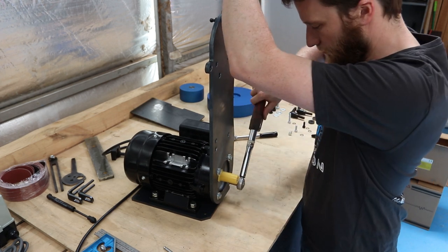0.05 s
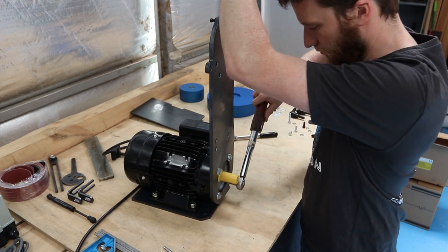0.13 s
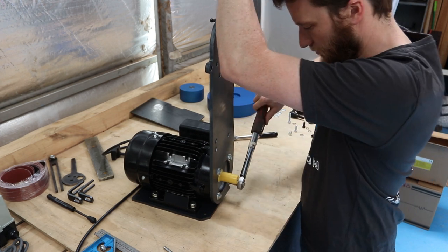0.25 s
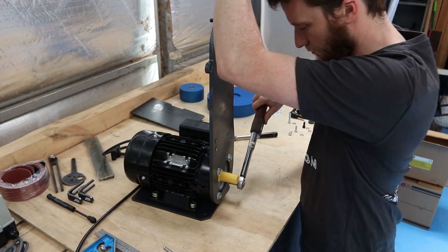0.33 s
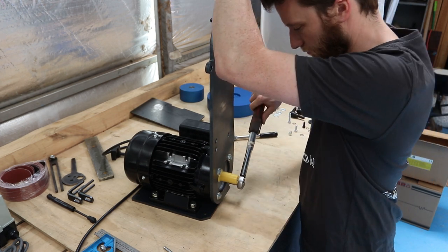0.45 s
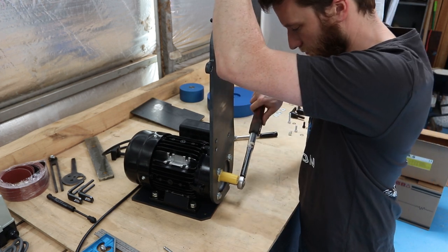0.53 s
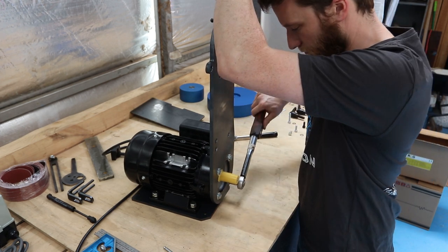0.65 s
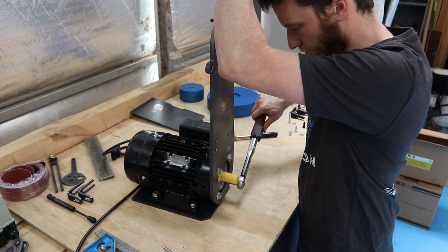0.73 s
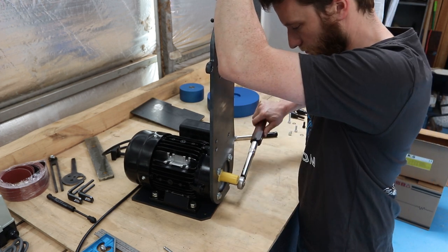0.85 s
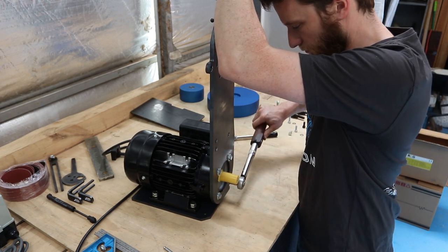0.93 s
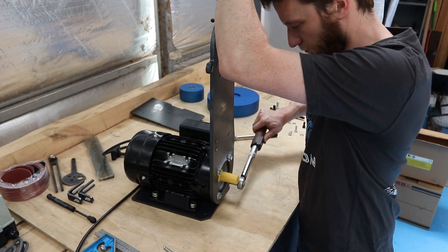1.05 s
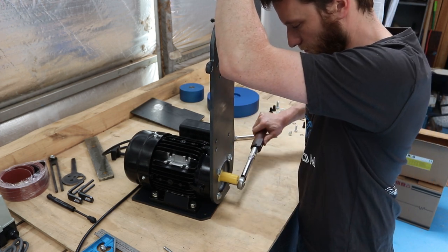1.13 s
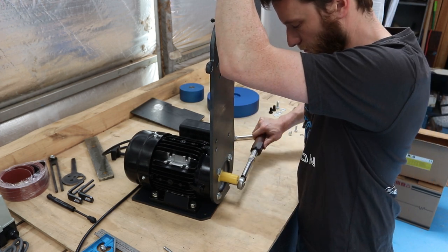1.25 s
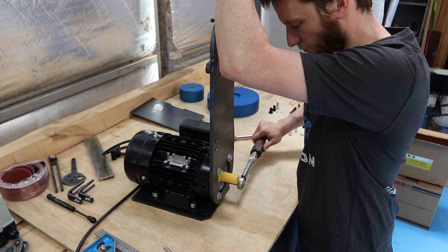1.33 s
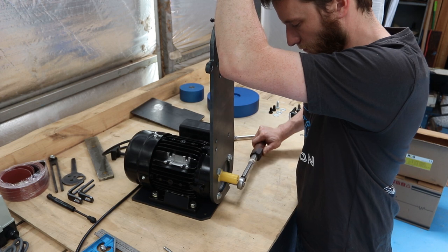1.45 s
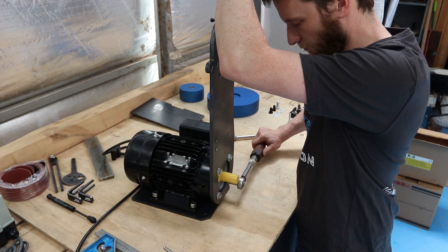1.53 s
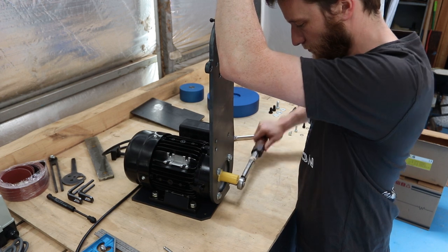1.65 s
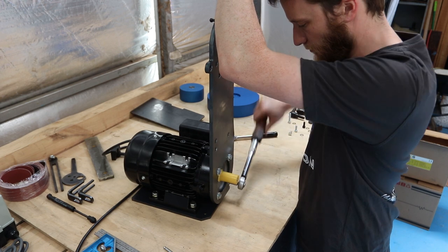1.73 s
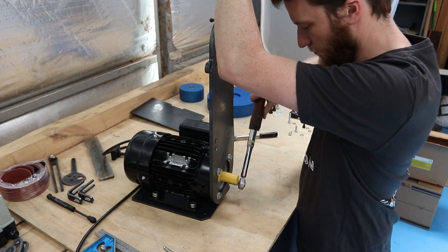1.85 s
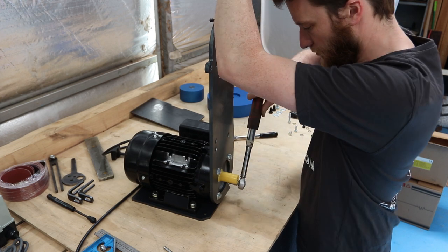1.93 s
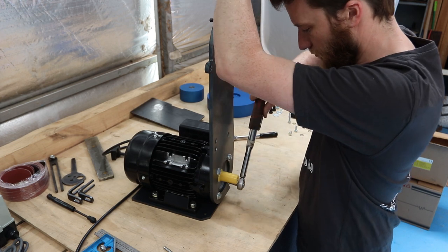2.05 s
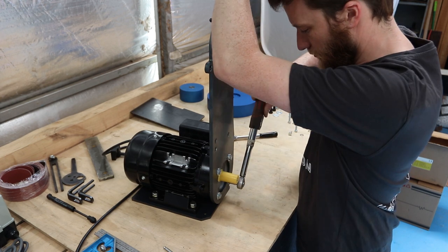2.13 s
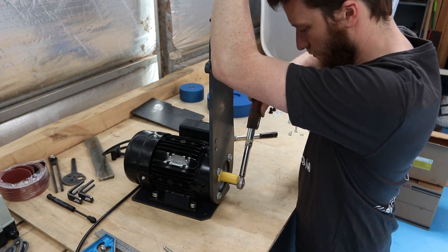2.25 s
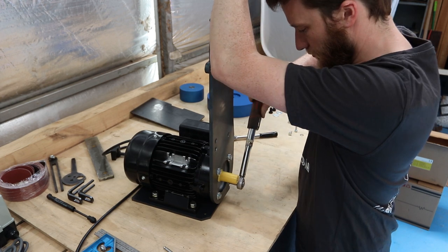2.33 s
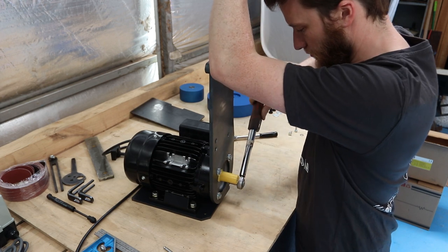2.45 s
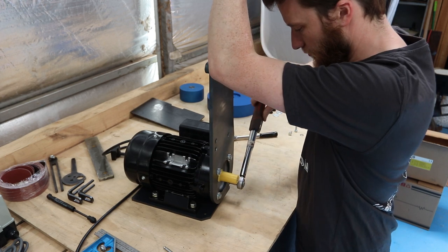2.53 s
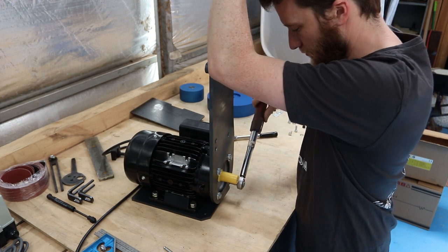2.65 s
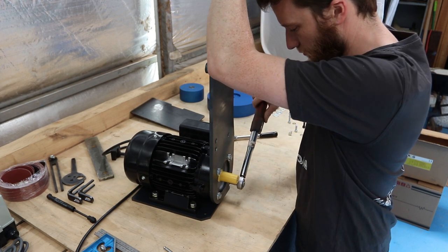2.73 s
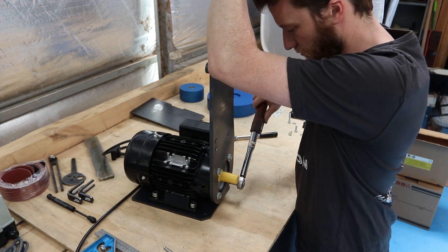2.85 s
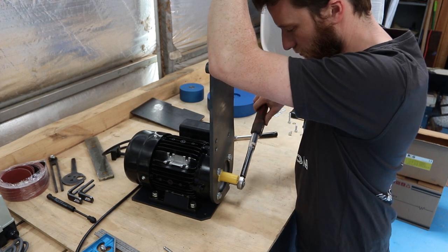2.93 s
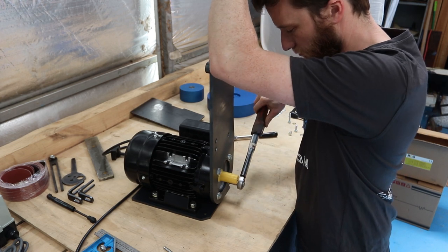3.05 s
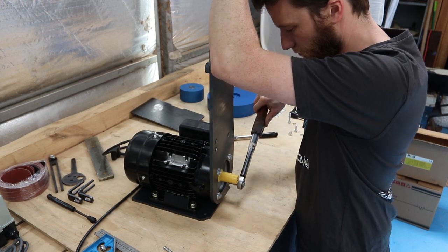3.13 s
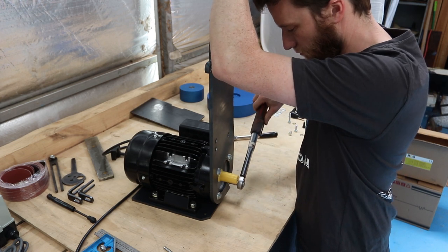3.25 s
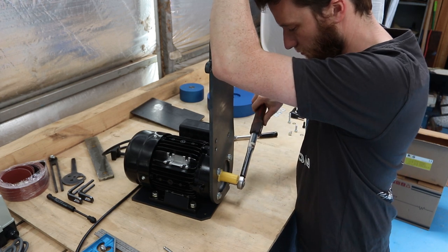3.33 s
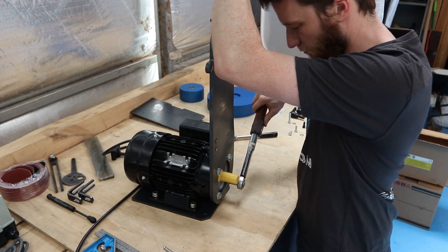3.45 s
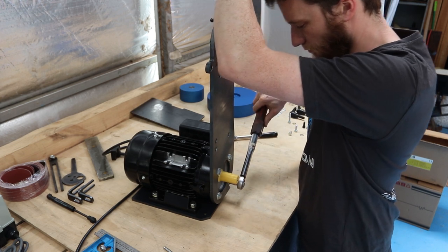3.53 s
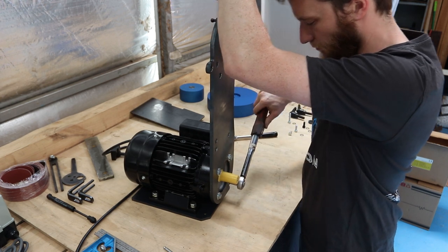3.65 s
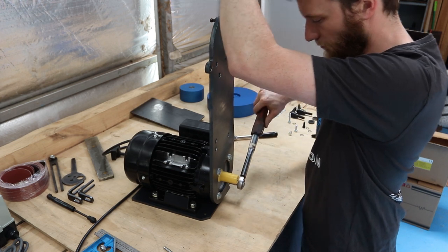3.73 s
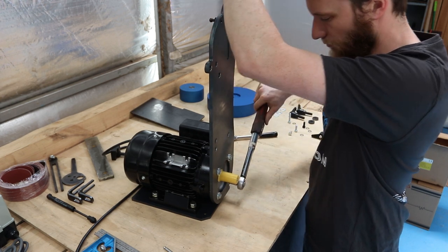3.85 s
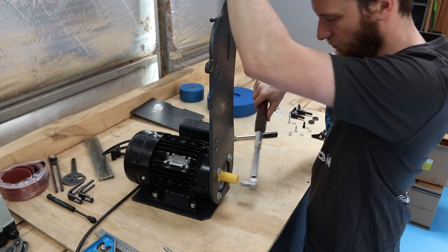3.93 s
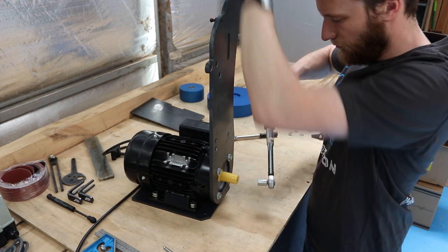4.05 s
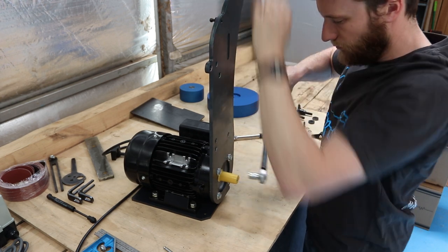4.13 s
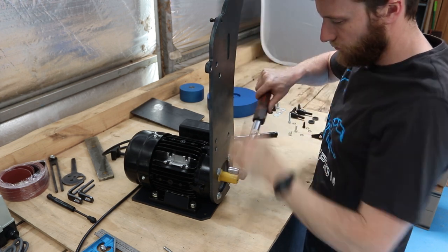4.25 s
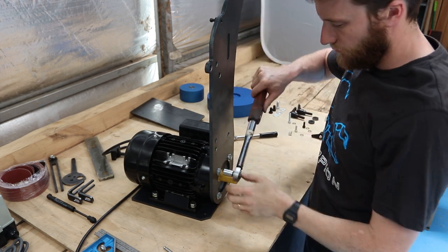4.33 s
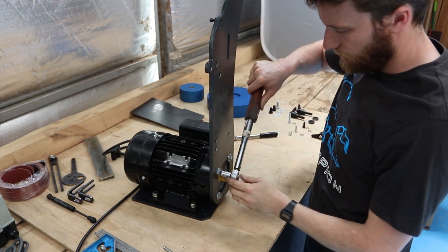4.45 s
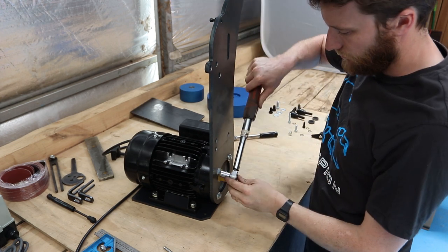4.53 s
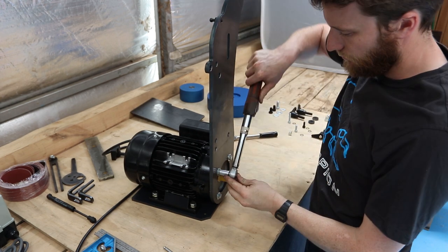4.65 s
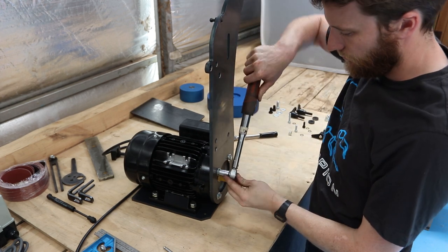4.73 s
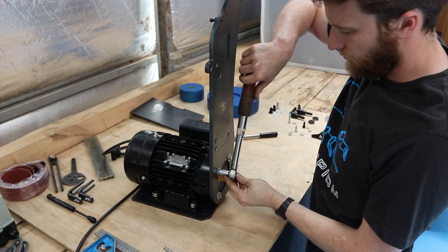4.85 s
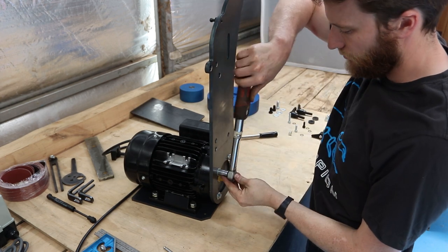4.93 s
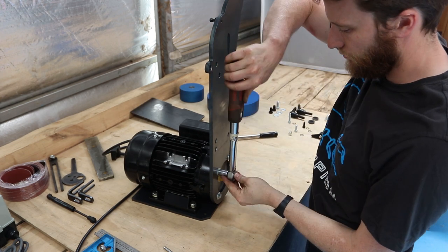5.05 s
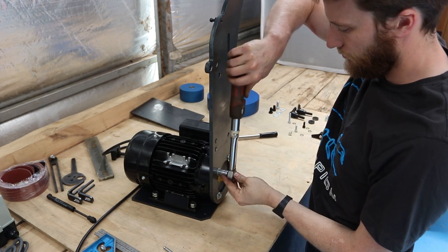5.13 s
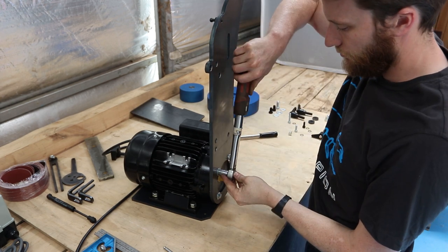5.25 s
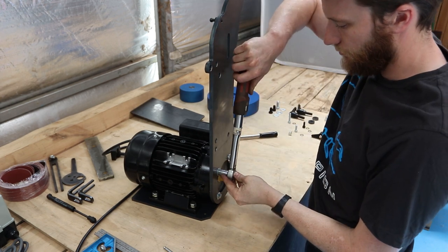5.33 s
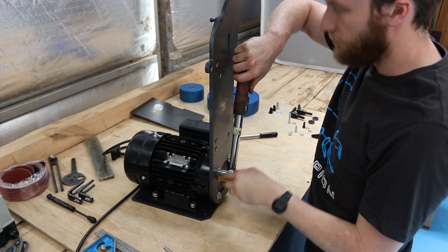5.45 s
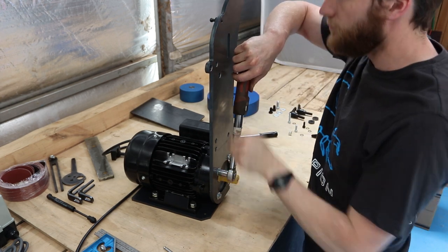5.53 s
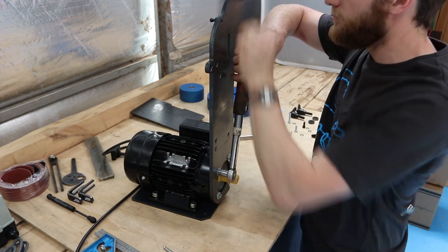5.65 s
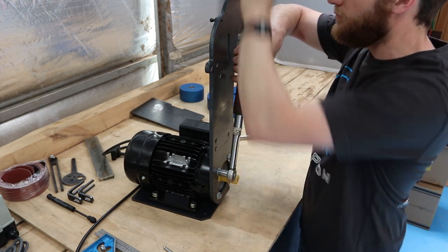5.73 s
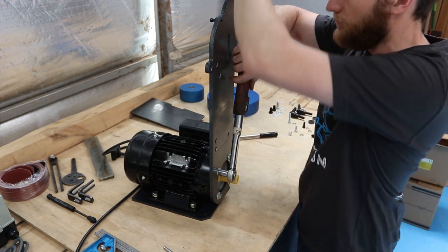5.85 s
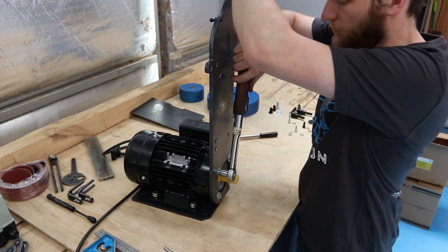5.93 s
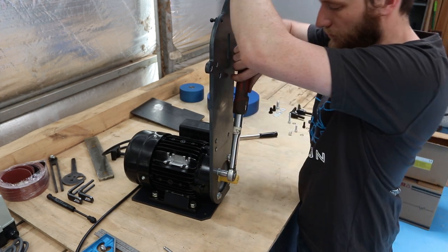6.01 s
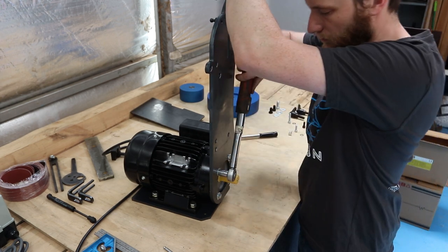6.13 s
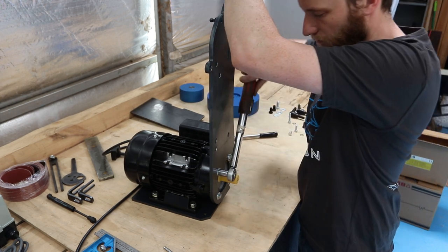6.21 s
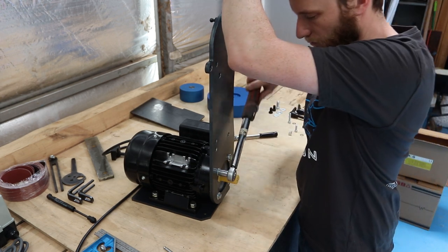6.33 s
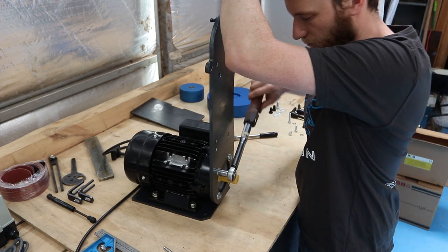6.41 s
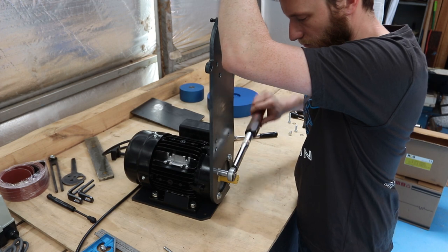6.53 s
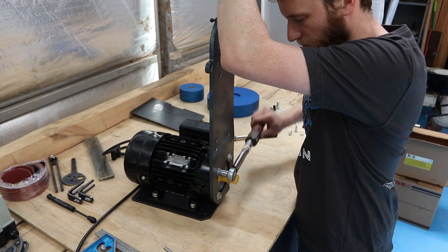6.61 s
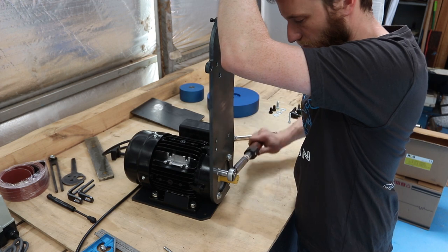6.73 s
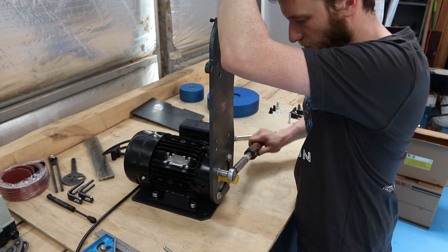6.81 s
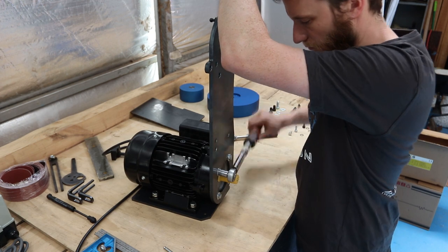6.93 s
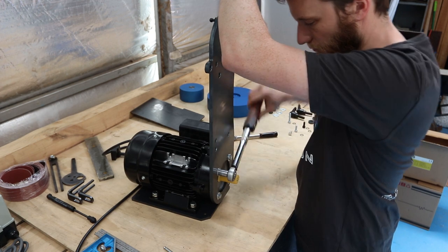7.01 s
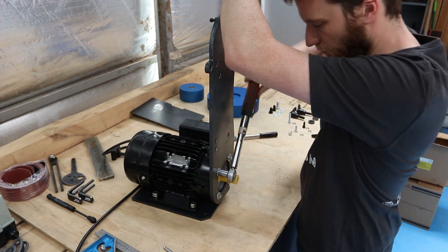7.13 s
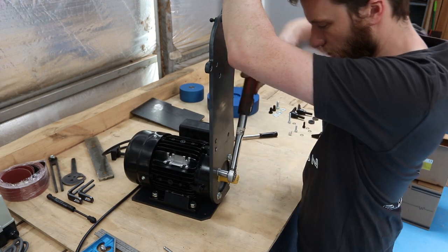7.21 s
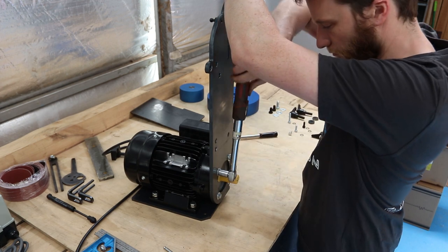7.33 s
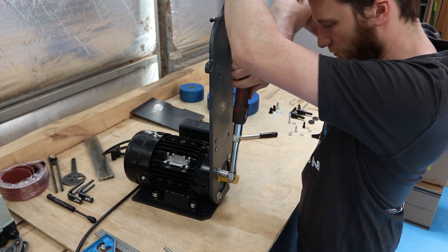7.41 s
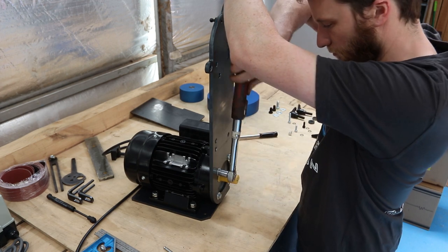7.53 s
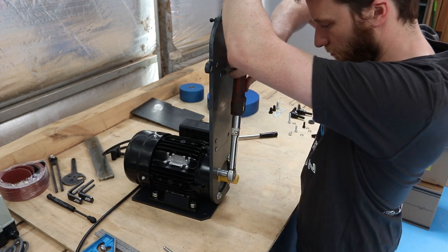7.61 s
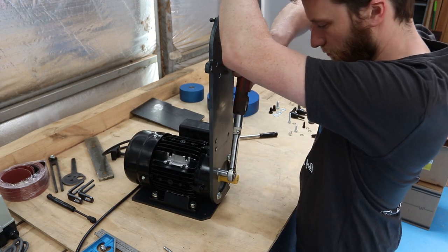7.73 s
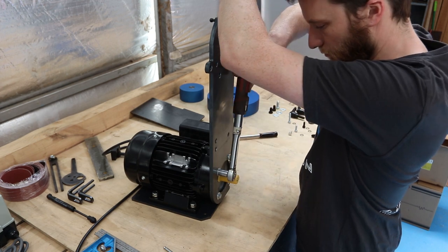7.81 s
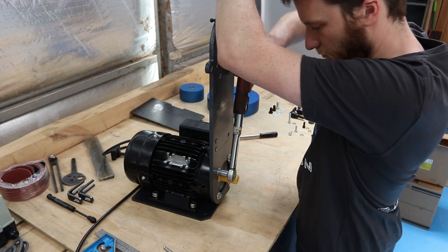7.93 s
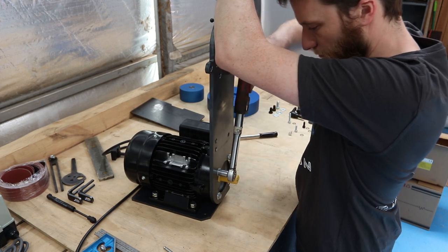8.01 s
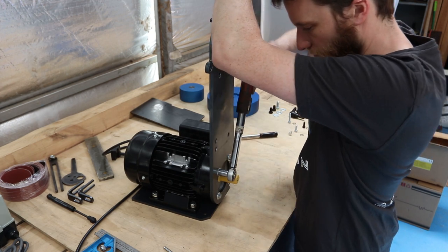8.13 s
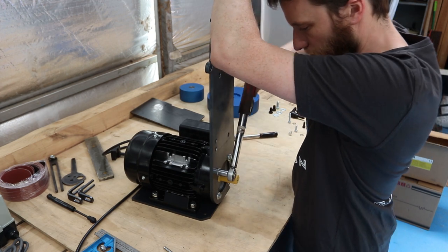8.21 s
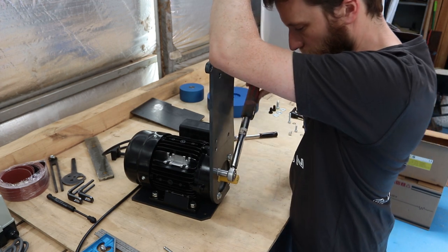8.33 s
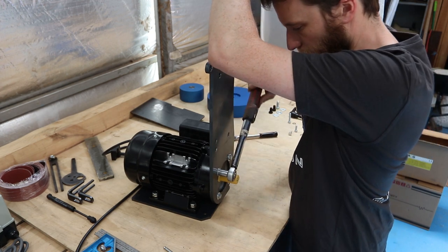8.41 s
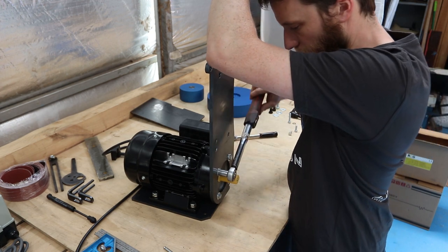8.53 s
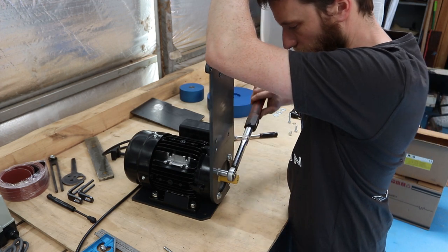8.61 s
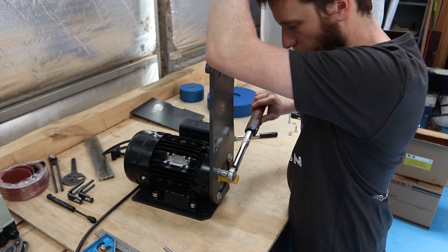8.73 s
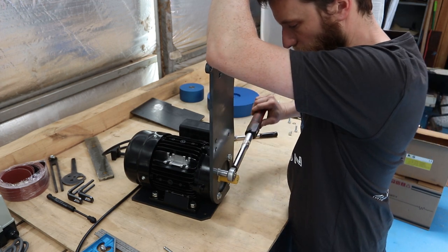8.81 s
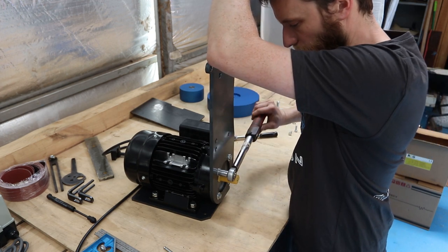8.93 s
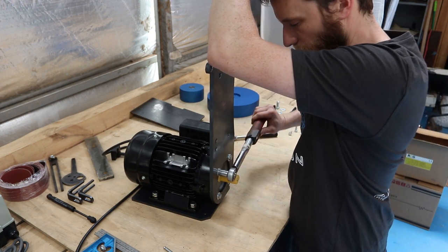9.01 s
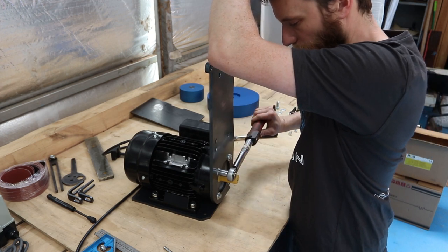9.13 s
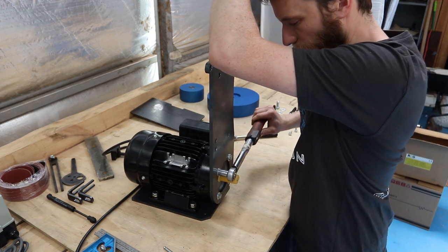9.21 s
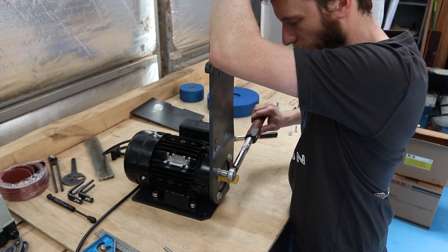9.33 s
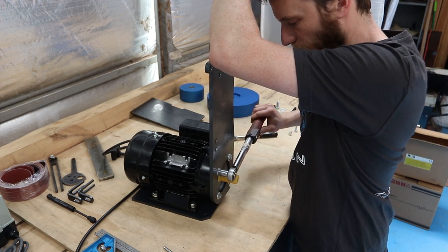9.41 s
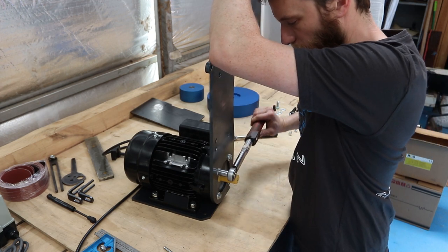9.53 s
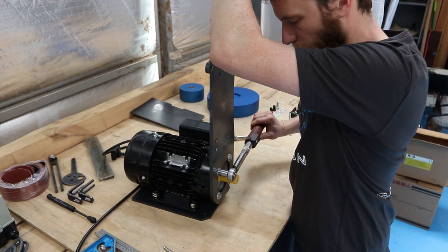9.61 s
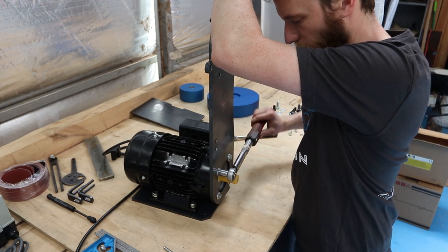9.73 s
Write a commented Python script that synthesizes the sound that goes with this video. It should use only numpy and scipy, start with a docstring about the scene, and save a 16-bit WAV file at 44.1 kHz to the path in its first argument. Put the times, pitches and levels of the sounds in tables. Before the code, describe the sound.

A wrench knocks, ticks through brief ratcheting runs and breaks over with hard metallic clacks, over faint outdoor rumble and distant birds.

```python
"""Torque wrench at the workshop bench

A wrench works bolts on a steel plate fixed to a motor on a wooden bench: loud clacks as it breaks over
and snaps back, pawl ticks on the back swings, knocks of the loose socket. Contacts are coloured noise
bursts with close echoes; the parts ring as dying sines. A sleeve rustles as filtered, grainy noise.
Outside, faint birds and a far engine are built from harmonics over a noise wash of traffic and air."""
import sys
import numpy as np
from scipy import signal
from scipy.fft import rfft, irfft
from scipy.io import wavfile

SR = 44100
rng = np.random.default_rng(int(sys.argv[2]) if len(sys.argv) > 2 else 0)


def master(y):
    """Save y as 16-bit WAV."""
    cut = np.clip(np.atleast_2d(y).T, -1, 1)
    pcm = np.round(cut * 32767)  # scale
    wavfile.write(sys.argv[1], SR, pcm.astype(np.int16))


N = 430857  # length in samples

# Wrench breaking over at the set torque. Each row: start in seconds, relative level in dB,
# relative ring of the tube in dB, centre of the clack in Hz, lift at that centre in dB.
BREAKS = [(2.9551, 1.5, -6.5, 3760, 5), (3.67, 0.5, 0, 3693, 8), (9.0785, -0.5, -2, 3940, 0.5),
          (9.6249, -0.5, 0.5, 3940, -1)]
# Head snapping back as the hand lets go. Each row: start in seconds, relative level in dB,
# relative ring of the tube in dB.
RETURNS = [(3.3074, -1.5, -8), (3.8806, -1, -20), (9.4020, -1, -10)]
# Colours of the two clacks. Each row: frequency in Hz, relative level in dB.
BREAK_COLOUR = [(60, -9), (250, -12), (700, -17), (1100, -9), (1700, -6), (2300, -11.5), (3000, -4),
                (3700, 4.5), (4700, -6.5), (6200, 0.5), (8000, -3), (13000, -2), (16000, -8)]
RETURN_COLOUR = [(60, -15.5), (280, -3.5), (700, -4), (1200, -4.5), (1700, -4), (2400, 2.5), (2850, 0),
                 (3450, 7.5), (4700, -3.5), (6500, -1), (9300, 1.5), (13000, -2.5), (16000, -8.5)]
# Ringing modes of wrench tube and steel plate. Each row: frequency in Hz, relative level in dB, t60 in seconds.
TUBE = [(3250, -12, .12), (3430, -9, .1), (3688, -3, .1), (3790, -4, .4), (3830, -3, .25), (3945, -6, .3),
        (4055, -8, .28), (5650, -12, .3), (5770, -10, .25), (6350, -9, .15)]
PLATE = [(82, -16, .15), (105, -11, .25), (170, -16, .08), (345, -13, .05), (484, -3, .05), (603, -35, 1.5),
         (662, -18, .22), (938, 0, .04), (1604, -12, .22), (1995, -15, .2), (2375, -14, .2)]
BREAK_SHUDDER_DB, RETURN_SHUDDER_DB = -29, -25.5  # relative to each clack


def clacks():
    """The toggle hits the tube; the shock runs into the plate, then motor (break) or bench (return)."""
    out = np.zeros(N)
    for s, db, tube_db, centre_hz, lift_db in BREAKS:
        peaks = head(freedom=0.79) + [(centre_hz, 600, lift_db)]
        clack = contact(BREAK_COLOUR, peaks, decay_s=0.0038, near_db=-4.5)
        ringing = amp(tube_db - 31.0) * ring(TUBE, scatter_db=1.5)
        ringing += amp(-27) * ring(PLATE, scatter_db=0)
        ringing += amp(-44.0) * ring(SPRING)
        shock = amp(BREAK_SHUDDER_DB) * shudder() + amp(-47) * ring(MOTOR, scatter_db=4.5)
        add(out, s + 0.000091, amp(db + 13.0) * clack)
        add(out, s, amp(db) * ringing)
        add(out, s + 0.0035, amp(db) * shock)
    for s, db, tube_db in RETURNS:
        clack = contact(RETURN_COLOUR, head(freedom=0.74), decay_s=0.0017, near_db=-5.5)
        ringing = amp(tube_db - 34.0) * ring(TUBE, scatter_db=0)
        ringing += amp(-28) * ring(PLATE, scatter_db=4)
        ringing += amp(-45) * ring(SOCKET)
        shock = amp(RETURN_SHUDDER_DB) * shudder() + amp(-26.5) * ring(BENCH, scatter_db=1.5)
        add(out, s + 0.00063, amp(db + 12.5) * clack)
        add(out, s, amp(db) * ringing)
        add(out, s + 0.0053, amp(db) * shock)
    return out


# Low thump of plate and bench. Each row: frequency in Hz, relative level in dB.
SHUDDER_COLOUR = [(50, -16), (100, -7), (270, -1.5), (450, 1.5), (650, -10), (950, -5), (1300, -12.5),
                  (1800, -10), (3000, -16.5), (8000, -39)]
SHUDDER_T60_S, SHUDDER_RISE_S = .11, .003  # rise is a time constant


def shudder():
    """The many close, well-damped low modes of plate and bench blur into one short thump."""
    t = np.arange(SR) / SR
    spectrum = amp(read(SHUDDER_COLOUR, np.fft.rfftfreq(SR, 1 / SR)))
    body = evened(irfft(rfft(rng.standard_normal(SR)) * spectrum, SR))
    return body * (1 - np.exp(-t / SHUDDER_RISE_S)) * np.exp(-np.log(1000) * t / SHUDDER_T60_S)


# Short-lived resonances of wrench head and socket. Each row: frequency in Hz, width in Hz,
# lift in dB when fully free, before scatter.
HEAD = [(820, 26, 9), (1167, 54, 7), (1550, 97, 6.5), (1665, 37, 11.5), (1774, 10, 10), (2045, 40, 12),
        (2267, 60, 3), (2556, 67, 10.5), (2723, 60, 10), (3234, 40, 11), (3500, 40, 9.5), (4104, 8.2, 4),
        (4510, 26, 7), (5100, 100, 6), (5600, 70, 3.5), (6380, 130, 4), (7390, 61, 3.5), (9326, 92, 4.5)]


def head(freedom):
    """The head rings less when it is clamped by load, and differently for every point of contact."""
    return [(hz, width, freedom * db * (1 + .2 * rng.standard_normal())) for hz, width, db in HEAD]


# Modes of the pawl spring. Each row: frequency in Hz, relative level in dB, t60 in seconds.
SPRING = [(10085, 0, .09), (10170, -5, .06), (11000, -8, .03)]
# Pawl dropping over a single tooth. Each row: time in seconds, relative level in dB, top treble lift in dB.
LONE_TICKS = [(2.5593, -37, -16), (5.9772, -31, -14)]
# Pawl spring twanging freely. Each row: start in seconds, level in dB.
TWANGS = [(1.804, -39), (1.906, -36), (1.9248, -46), (7.2196, -32.5), (7.2893, -39)]
PAWL_DROP_S = .0016  # from passing the tooth to the snap


def ratchet():
    """Every snap rings the pawl spring a little; now and then the spring twangs."""
    out = np.zeros(N)
    for s, db, top_db, *_ in teeth() + LONE_TICKS:
        add(out, s + PAWL_DROP_S, snap(db, top_db))
        add(out, s + PAWL_DROP_S, amp(db - 33) * ring(SPRING))
    for s, db in TWANGS:
        add(out, s, amp(db) * ring(SPRING, scatter_db=4))
    return out


# Back swings of the handle, one curve a swing. Each row: time in seconds, angle in teeth passed.
SWINGS = [
    [(1.8038, 0), (1.8505, 2), (1.8612, 3), (1.8855, 4), (1.9245, 6), (1.9697, 7), (2.0061, 8)],
    [(4.8478, 0), (4.9193, 1), (4.9742, 2), (5.0785, 4)],
    [(7.0551, 0), (7.0985, 2), (7.1757, 6), (7.1909, 7), (7.2193, 8), (7.2571, 10), (7.2902, 11),
     (7.3365, 13), (7.3792, 14), (7.4481, 16)],
]
# Sound of the wrench along the swings. Each row: time in seconds, relative tick level in dB,
# top treble lift of the tick in dB, relative rattle of the socket in dB.
SWING_LEVELS = [(1.80, -27.5, 11, -30), (1.86, -27, 7, -19.5), (2.0, -27.5, 3, -27), (4.85, -27.5, 5, -35),
                (4.92, -24, -7, -30), (4.975, -20, 5, -26), (5.03, -28.5, 4, -28), (5.08, -21.5, 8, -21),
                (7.05, -30.5, -9, -21), (7.1, -26.5, 6, -25), (7.19, -25, 6, -20.5),
                (7.22, -20.5, 4, -20.5), (7.249, -28.5, 2, -24), (7.29, -20, 6, -23), (7.32, -29, 6, -30),
                (7.38, -24.5, -1, -22.5), (7.45, -26, 0, -33)]


def teeth():
    """The pawl drops as the handle passes each tooth: rows of (s, tick dB, top treble dB, rattle dB)."""
    times = []
    for swing in SWINGS:
        s, angle = np.transpose(swing)
        times += list(np.interp(np.arange(angle[-1] + 1), angle, s))
    s, *levels = np.transpose(SWING_LEVELS)
    return [(at, *(np.interp(at, s, db) for db in levels)) for at in times]


# Colour of a pawl tick. Each row: frequency in Hz, relative level in dB.
TICK_COLOUR = [(100, -27.5), (900, -7.5), (2000, -2), (3000, 5), (5000, 3.5), (8000, 4.5), (11500, 8),
               (14500, 0.5), (16500, -7)]
TOOTH_SCATTER_DB = 2.7  # no two teeth are worn alike
SNAP_HZ, SNAP_WIDTH_HZ, SNAP_DB = 10100, 1200, 6  # typical strongest overtone
SNAP_SPREAD = .18  # spread of that overtone's pitch, as natural log of frequency
TOP_HZ, TOP_WIDTH_HZ = 14400, 4800  # top treble


def snap(db, top_db):
    """One tooth gives a tiny snap of its own colour."""
    # the pawl lands on a different spot of every tooth, which favours some overtones and starves others
    uneven = [(hz, 800, 3.5 * rng.standard_normal()) for hz in np.linspace(3000, 15000, num=11)]
    centre, strength = rng.standard_normal(2)
    overtone = (SNAP_HZ * np.exp(SNAP_SPREAD * centre), SNAP_WIDTH_HZ, SNAP_DB)
    peaks = head(freedom=1.0) + uneven + [overtone, (TOP_HZ, TOP_WIDTH_HZ, top_db)]
    tick = contact(TICK_COLOUR, peaks, decay_s=0.00187, near_db=-14.0)
    return amp(db + 13.0 + TOOTH_SCATTER_DB * strength) * tick


# Loose socket knocking on wrench and bolt. Each row: start in seconds, relative level in dB,
# brightness in dB per octave, which the contact limits to -4..3.
KNOCKS = [(0.035, -15.5, 0), (0.112, -17, 9), (1.726, -25.5, -23), (1.779, -19.5, -7), (1.83, -10, -6),
          (1.843, -8.5, -8), (2.127, -0.5, 3), (2.152, -21, -4), (2.177, -17.5, -7), (2.203, -13.5, -11),
          (2.284, -18, -8.5), (2.558, -17, -6), (4.573, 4.5, 5), (4.714, -9.5, -1.5), (4.735, -8.5, 3),
          (4.783, -0.5, 2), (5.064, -14, -3), (5.283, -5, 0.5), (5.98, -9.5, -1), (6.957, -15, -5),
          (7.035, -13.5, -13), (7.669, -29.5, -10), (8.378, -32, -12)]
# Colour of a knock. Each row: frequency in Hz, relative level in dB.
KNOCK_COLOUR = [(60, -8), (140, -9), (300, -4.5), (550, -13), (800, -9.5), (1200, -10), (2000, -4),
                (2800, 1), (3600, 1), (4500, -6), (6500, -10), (10000, -20), (15500, -36)]
# Pushes on the wrench that jolt the motor on the bench. Each row: start in seconds,
# thump of the bench in dB, hum of the housing in dB.
BUMPS = [(.3, -58, -51), (0.501, -51.5, -66), (1.842, -39.5, -43.5), (1.89, -51, -47.5), (2.132, -45, -49),
         (4.584, -71, -48.5), (4.757, -67, -43), (5.071, -62.5, -51), (5.314, -44, -52.5),
         (5.989, -73.5, -54)]
# Modes of socket, bench and motor housing. Each row: frequency in Hz, relative level in dB, t60 in seconds.
SOCKET = [(1637, -16, .16), (1997, -5, .2), (2557, -3, .18), (2805, -2, .2), (3255, -4, .15),
          (3472, -5, .18), (4050, -10, .2), (5150, -12, .2)]
BENCH = [(160, -8, .05), (205, -3, .04), (245, 0, .045), (280, 1, .04), (318, -1, .035), (470, -4, .03),
         (605, -6, .035)]
MOTOR = [(122, -2, .2), (140, -1, .2), (335, -19, .5)]
# decay scale of a 0 dB knock; one this many dB softer rattles twice as long
RATTLE_S, RATTLE_DOUBLES_DB = 0.0049, 33
SWING_RATTLE_S = 0.01  # decay scale of the rattle with each tooth
RING_DB, RING_GROWTH = -45, 0.93  # a firm knock also presses on the socket, so its ring grows more slowly


def socket():
    """The socket rattles in its play and rings, at each knock and tooth; a push jolts motor and bench."""
    out = np.zeros(N)
    for s, db, bright_db in KNOCKS:
        rattle_s = RATTLE_S * 2 ** (-db / RATTLE_DOUBLES_DB)
        knock = contact(KNOCK_COLOUR, head(freedom=0.98), rattle_s, near_db=0.5, tilt_db=bright_db)
        add(out, s + .001, amp(db - 6.5) * knock)
        add(out, s, amp(RING_GROWTH * db + RING_DB) * ring(SOCKET, scatter_db=-0.5))
    for s, _, _, db in teeth():
        rattle = contact(KNOCK_COLOUR, head(freedom=0.27), SWING_RATTLE_S, near_db=4.5, tilt_db=-3.5)
        add(out, s + .002, amp(db - 5) * rattle)
        add(out, s + 0.00203, amp(db - 40) * ring(SOCKET, scatter_db=6))
    for s, bench_db, housing_db in BUMPS:
        thump = amp(bench_db) * ring(BENCH, scatter_db=3.5)
        hum = amp(housing_db) * ring(MOTOR, scatter_db=2.5)
        add(out, s, thump + hum)
    return out


def contact(colour, peaks, decay_s, near_db, tilt_db=0, size=8192):
    """Steel chatters on steel: a fast-dying burst with a causal colour and its close reflections."""
    t, hz = np.arange(size) / SR, abs(np.fft.fftfreq(size, 1 / SR))
    fade = np.exp(-(t / decay_s) ** 1.8)
    burst = rng.standard_normal(size) * fade
    # each contact is sharp, so all frequencies are driven about equally
    burst = irfft(np.exp(1j * np.angle(rfft(burst)))) * np.sqrt(fade)
    # sparse echoes off bench, plate and body, drawn anew each time; the wall answers a little later
    near = rng.standard_normal(size) * (rng.random(size) < .08) * (t > .0015) * np.exp(-t / 0.0077)
    wall = 0.22 * (np.arange(size) == round(.0122 * SR))
    paths = 1 + amp(near_db) * np.fft.fft(near / np.linalg.norm(near) + wall)
    shape_db = read(colour, hz) + np.clip(tilt_db, -4, 3) * np.log2(1 + hz / 1000)
    shape_db += sum(db / (1 + (2 * (hz - centre) / width) ** 2) for centre, width, db in peaks)
    # minimum phase: the colour never sounds ahead of the hit
    causal = np.exp(np.conj(signal.hilbert(np.log(amp(shape_db)))))
    direct = np.fft.fft(burst) * causal
    return np.fft.ifft(direct * paths).real / np.sqrt(np.mean(abs(direct) ** 2))


def ring(modes, scatter_db=6.5):
    """Struck modes are dying sines; every blow draws their phases, and any level scatter, anew."""
    t = np.arange(SR) / SR
    tones = np.zeros(SR)
    for hz, db, t60 in modes:
        level = amp(db + scatter_db * rng.standard_normal())
        tones += level * np.exp(-np.log(1000) * t / t60) * np.sin(2 * np.pi * (hz * t + rng.random()))
    return tones * (1 - np.exp(-t / 0.00033))


# Hand shifting on the grip, sleeve brushing past. Each row: start in seconds, length in seconds, level in dB.
RUSTLES = [(0, 0.11, -60), (0.177, 0.4, -75), (1.617, 0.26, -75), (4.22, 0.22, -77), (5.484, .45, -71),
           (6.647, 0.43, -73)]
# Colour of the cloth. Each row: frequency in Hz, relative level in dB.
RUSTLE_COLOUR = [(100, -5), (300, 4), (1000, 0), (3200, 8.5), (5000, -1), (9000, -4), (15000, -8)]


def cloth():
    """Skin and cotton rub softly: coloured noise in grainy swells."""
    out = np.zeros(N)
    spectrum = amp(read(RUSTLE_COLOUR, np.fft.rfftfreq(N, 1 / SR)))
    hiss = irfft(rfft(rng.standard_normal(N)) * spectrum, N)
    grain = evened(hiss * amp(1.3 * drift(per_s=140)))
    for s, length, db in RUSTLES:
        rub = grain[max(round(s * SR), 0):][:round(length * SR)]
        add(out, s, amp(db) * rub * signal.windows.tukey(len(rub), .5))
    return out


# Bird calls. Each row: start in seconds, length in seconds, starting pitch in Hz, final pitch in Hz
# (both before waver), relative level in dB, hoarseness as relative pitch jitter.
BIRD_CALLS = [(4.131, 0.076, 1337, 1300, -71.5, .006), (4.46, 0.06, 1284, 1318, -69.5, 0.0082),
              (5.40, 0.095, 1270, 1252, -68, 0.021), (5.528, 0.08, 980, 1017, -59, 0.02),
              (5.919, .21, 2910, 4040, -68.5, .01), (6.761, .075, 2140, 3130, -60.5, .022),
              (6.829, 0.21, 1226, 1398, -55.5, 0.021), (8.223, .3, 2166, 3015, -60.5, 0.016),
              (8.307, 0.18, 3630, 4080, -65, 0.019)]
# Throat resonance. Each row: frequency in Hz, relative level in dB.
BIRD_THROAT = [(1300, -13.5), (2200, -7.5), (3000, 0), (4000, -5.5), (5500, -9), (7000, -20), (9500, -24),
               (13000, -36)]
CALL_EDGE_DB = -6.5  # a call swells toward its middle from this much lower
CALL_WAVER, CALL_FLUTTER_DB = 0.021, 4  # rms pitch waver as a ratio, rms level flutter


def birds():
    """Thin, nasal, slightly hoarse calls: harmonics through a throat, swelling and mostly sliding upward."""
    out = np.zeros(N)
    jitter, waver = drift(per_s=333), CALL_WAVER * drift(per_s=32.5)
    flutter = amp(CALL_FLUTTER_DB * drift(per_s=91))
    for s, length, from_hz, to_hz, db, hoarse in BIRD_CALLS:
        u = np.linspace(0, 1, round(length * SR))
        glide = from_hz + (to_hz - from_hz) * np.sin(np.pi * u / 2) ** 2
        hz = glide * (1 + waver + hoarse * jitter)[round(s * SR):][:len(u)]
        turns = np.cumsum(hz) / SR
        voice = np.zeros(len(u))
        for k in range(1, 9):
            below_nyquist = k * hz < SR / 2
            voice += amp(read(BIRD_THROAT, k * hz)) * below_nyquist * np.sin(2 * np.pi * k * turns)
        swell = amp(db + CALL_EDGE_DB * (2 * u - 1) ** 2)
        add(out, s, swell * evened(voice) * signal.windows.tukey(len(u), .2))
    return out * flutter


# Far engine. Each row: time in seconds, firing rate in Hz, level in dB (both before waver).
ENGINE = [(0, 48.48, -64), (.45, 51, -56), (2.6, 50.8, -68.5), (3.399, 53.5, -59), (4.298, 54.72, -55.5),
          (5.1, 50.33, -56), (6.199, 47.03, -56.5), (6.9, 42.08, -61), (8.2, 39.67, -60),
          (9.77, 40.68, -57)]
ENGINE_WAVER_DB = 2  # rms
# Colour of the outdoor murmur. Each row: frequency in Hz, relative density in dB per Hz.
AMBIENCE = [(20, -36.5), (45, -11), (75, -7.5), (115, -10.5), (200, -16.5), (330, -22), (650, -32),
            (1000, -26.5), (1500, -34), (2700, -45), (3600, -42), (4800, -50), (11000, -55.5), (16000, -68)]
AMBIENCE_DB = -55.5  # before the fades
# the traffic slowly recedes
RUMBLE_DB, RUMBLE_FADE_DB_PER_S, AIR_FADE_DB_PER_S = -1.03, 0.85, 0.34


def outdoors():
    """A far engine drones on two harmonics, revving up and then down, under a fading wash of noise."""
    t, hz = np.arange(N) / SR, np.fft.rfftfreq(N, 1 / SR)
    s, rate, level = np.transpose(ENGINE)
    turns = np.cumsum(np.interp(t, s, rate) * (1 + 0.013 * drift(per_s=24))) / SR
    drone = evened(np.sin(2 * np.pi * turns) + amp(-11.0) * np.sin(4 * np.pi * turns))
    engine = amp(np.interp(t, s, level) + ENGINE_WAVER_DB * drift(per_s=3.4)) * drone
    wash = evened(irfft(rfft(rng.standard_normal(N)) * amp(read(AMBIENCE, hz)), N))
    rumble = signal.sosfiltfilt(signal.butter(2, 400, fs=SR, output="sos"), wash)
    air = (wash - rumble) * amp(-AIR_FADE_DB_PER_S * t)
    rumble = rumble * amp(RUMBLE_DB - RUMBLE_FADE_DB_PER_S * t + 1.7 * drift(per_s=3.5))
    return engine + amp(AMBIENCE_DB) * (rumble + air)


# Reverb time of the room. Each row: frequency in Hz, t60 in seconds.
ROOM_T60 = [(100, 0.51), (400, 0.21), (1500, 0.33), (4000, .46), (8000, 0.35), (15000, 0.28)]
ROOM_BASS_DB, ROOM_BASS_HZ = 3, 800  # the tail is fuller below this frequency


def workshop(x, tail_db):
    """The room answers with a sparse noise tail that dies at its own pace in each frequency band."""
    t = np.arange(SR) / SR
    sparse = rng.standard_normal(SR) * (rng.random(SR) < .2)
    hz, age, z = signal.stft(sparse, SR, nperseg=256)
    z *= amp(ROOM_BASS_DB / (1 + (hz[:, None] / ROOM_BASS_HZ) ** 4))
    decay = np.exp(-np.log(1000) * age / read(ROOM_T60, hz)[:, None])
    tail = signal.istft(z * decay, SR, nperseg=256)[1][:SR]
    tail *= np.clip(t / 0.019 - .5, 0, 1)  # silent at first, then fades in
    return x + amp(tail_db) * signal.fftconvolve(x, tail / np.linalg.norm(tail))[:N]


def amp(db):
    """Decibels to gain."""
    return 10 ** (np.asarray(db) / 20)


def evened(x):
    """Scales to rms 1."""
    return x / np.sqrt(np.mean(x ** 2) + 1e-20)


def read(points, hz):
    """Reads a table on a log-frequency axis."""
    f, value = np.transpose(points)
    return np.interp(np.log(hz + 1), np.log(f + 1), value)


def add(mix, s, sound):
    """Mixes a sound in at time s."""
    part = mix[max(round(s * SR), 0):][:len(sound)]
    part += sound[:len(part)]


def drift(per_s):
    """Random wander of rms 1, its spectrum falling off around per_s in Hz."""
    lowpass = np.exp(-(np.fft.rfftfreq(N, 1 / SR) / per_s) ** 2)
    return evened(irfft(rfft(rng.standard_normal(N)) * lowpass, N))


def scene():
    """The wrench close by, the birds mostly by way of the room."""
    wrench = workshop(clacks(), tail_db=-17)
    wrench += workshop(ratchet(), tail_db=-17.5)
    wrench += workshop(socket(), tail_db=-15)
    calls = amp(-2.5) * workshop(birds(), tail_db=1.5)
    return (wrench + calls + cloth() + outdoors())[None]


EDGE_HZ = 16300  # upper band limit


def record(dry):
    """Peaks flatten near full scale; then a steep lowpass limits the band."""
    held = np.clip(dry, -.9, .9)
    lowpass = signal.firwin(255, EDGE_HZ, window=("kaiser", 9), fs=SR)
    return signal.oaconvolve(held, lowpass[None], "same")


dry = scene()
out = record(dry)
master(out)
```